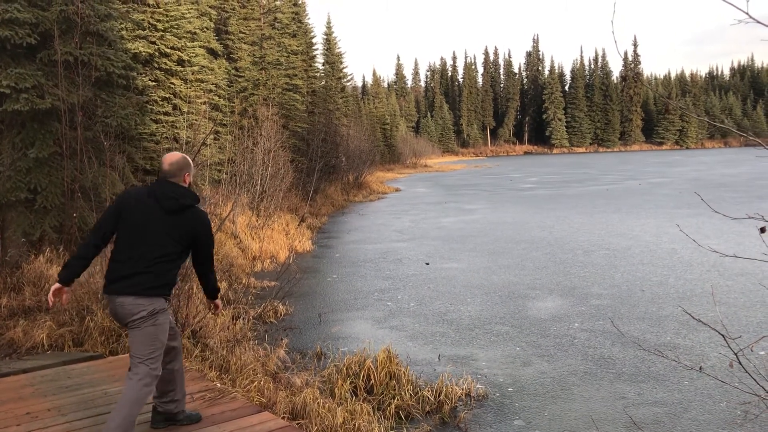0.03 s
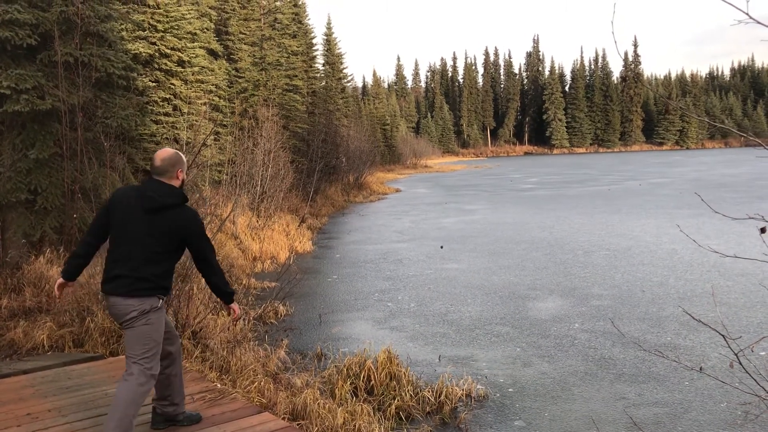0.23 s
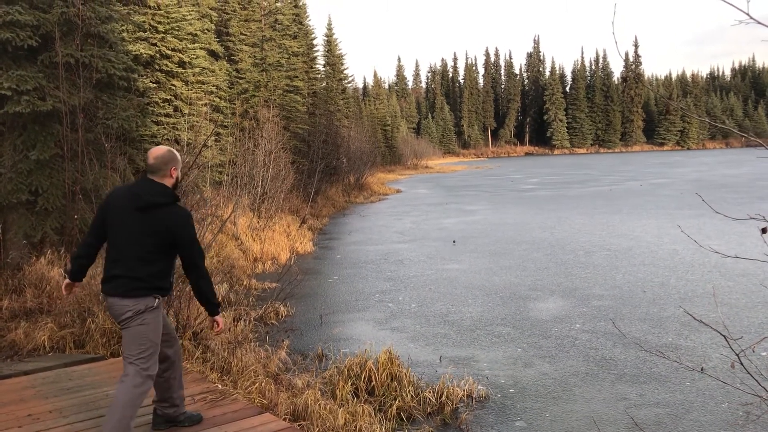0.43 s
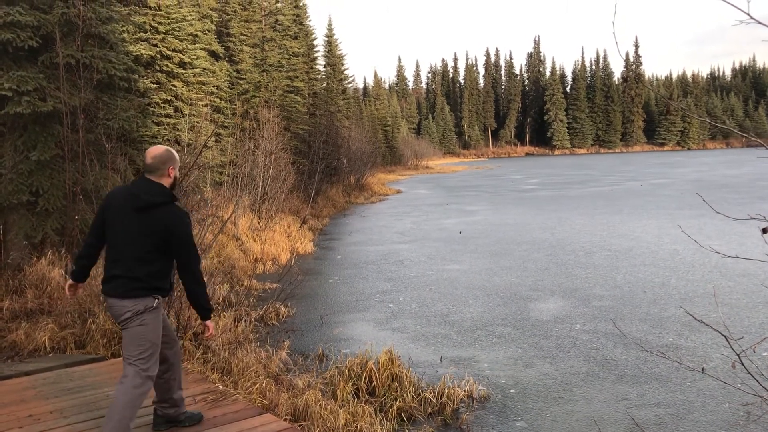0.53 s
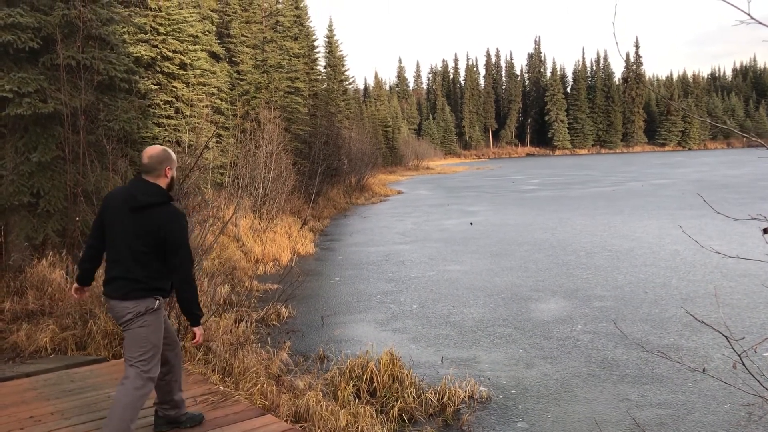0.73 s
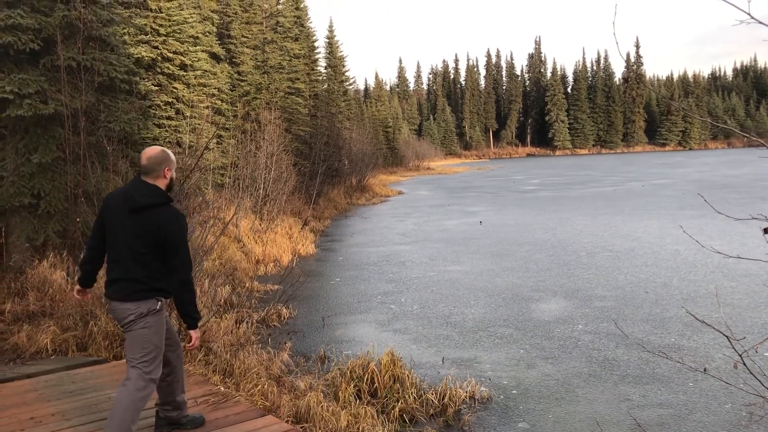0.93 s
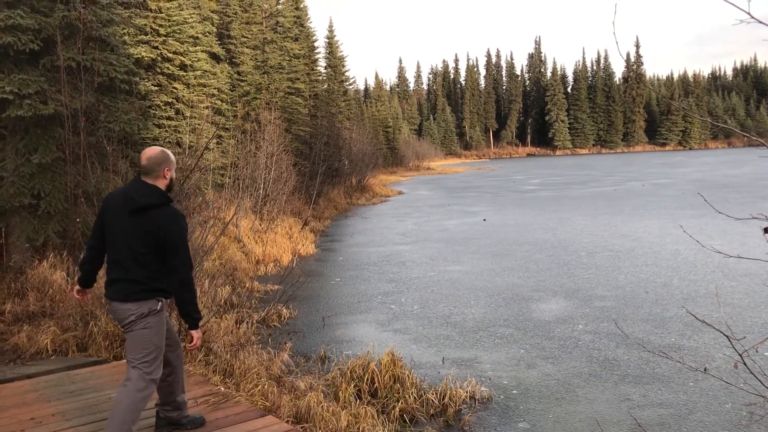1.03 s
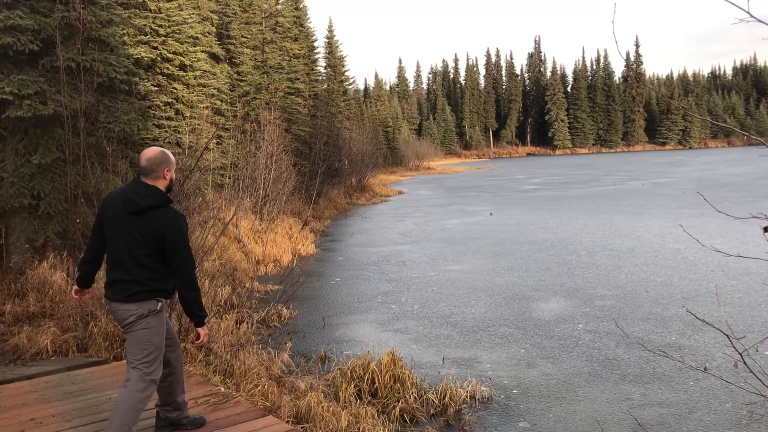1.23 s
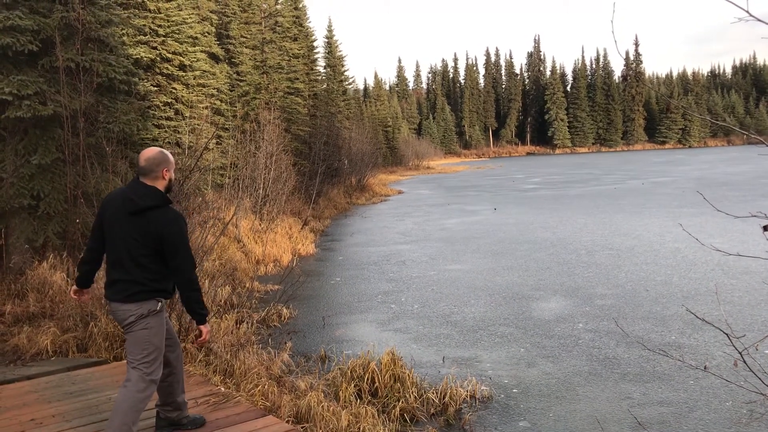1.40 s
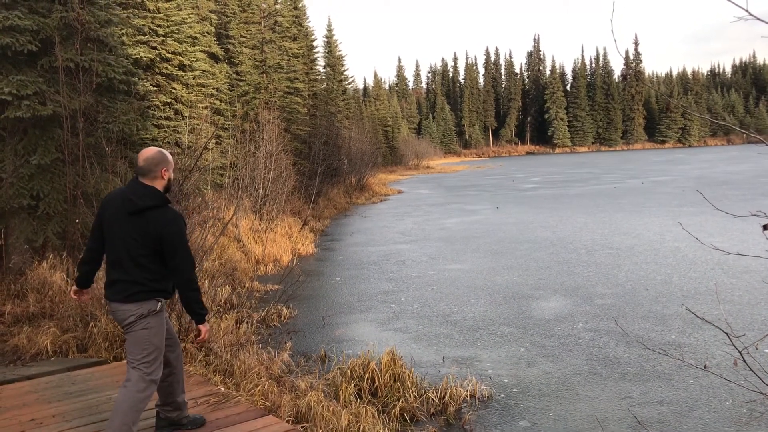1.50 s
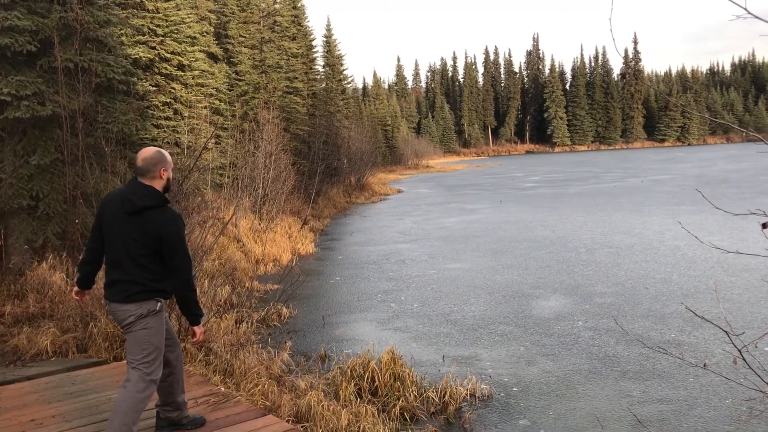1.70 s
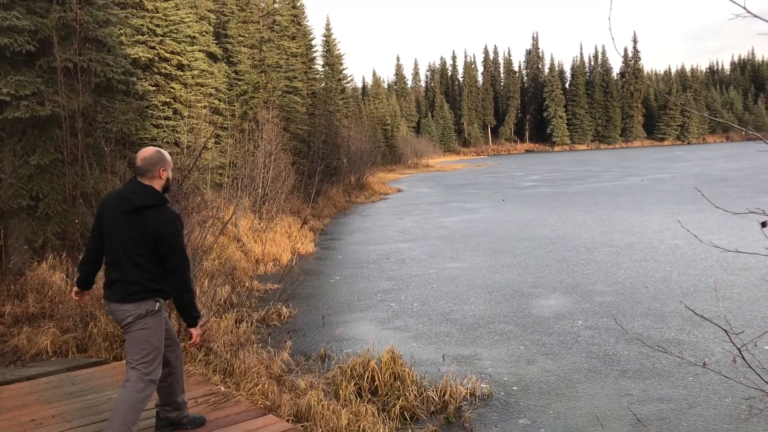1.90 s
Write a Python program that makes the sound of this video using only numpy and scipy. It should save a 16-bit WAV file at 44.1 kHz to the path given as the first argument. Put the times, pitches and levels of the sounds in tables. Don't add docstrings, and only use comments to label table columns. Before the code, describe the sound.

Thin lake ice chirps under a skipping stone: one loud near hit, a softer double, then a run of faint distant ones, over ringing ice hum and quiet outdoor air, mono microphone on the shore.

```python
import sys
import numpy as np
from scipy import signal
from scipy.fft import rfft, irfft
from scipy.io import wavfile
from scipy.ndimage import uniform_filter1d

SR = 44100
rng = np.random.default_rng(int(sys.argv[2]) if len(sys.argv) > 2 else 0)


def field_ratio(decibels):
    return 10 ** (np.asarray(decibels, dtype=float) / 20)


def int16_out(signal):
    q = np.round(np.clip(np.atleast_2d(signal).T, -1, 1) * 32767)
    wavfile.write(sys.argv[1], SR, q.astype(np.int16))


N = 85995


def evened(x):
    return x / np.sqrt(np.mean(x ** 2) + 1e-20)


def read(points, hz):
    f, value = np.transpose(points)
    return np.interp(np.log(hz + 1), np.log(f + 1), value)


def add(mix, start_s, sound):
    part = mix[round(start_s * SR):][:len(sound)]
    part += sound[:len(part)]


def resonate(x, hz, width_hz):
    turn = np.exp(2j * np.pi * hz * np.arange(len(x)) / SR)
    r = np.exp(-np.pi * width_hz / SR)
    return 2 * (turn * signal.lfilter([1 - r], [1, -r], x / turn)).real


def coloured(x, points):
    gain = field_ratio(read(points, np.fft.rfftfreq(len(x), 1 / SR)))
    return irfft(rfft(x) * gain, len(x))


def drift(noise, span_s):
    r = np.exp(-1 / (span_s * SR))
    return evened(signal.lfilter([1], [1, -2 * r, r * r], noise))


def tail(x, decays):
    taps = np.zeros(N)
    at = np.arange(0, N - 20, 20)
    taps[at + rng.integers(0, 20, len(at))] = rng.choice([-1., 1.], len(at))
    hz, t, z = signal.stft(taps, SR, nperseg=256)
    t60_s = np.maximum(read(decays, hz), .02)[:, None]
    echoes = signal.istft(z * field_ratio(-60 * t / t60_s), SR, nperseg=256)[1][:N]
    build_s = .003
    echoes = echoes * np.minimum(np.arange(len(echoes)) / SR / build_s, 1)
    return signal.fftconvolve(x, echoes / np.linalg.norm(echoes[:SR // 10]))[:N]


def tails(x, decays):
    turn = np.arange(N) / SR * 2.3
    shares = [np.sqrt(2 / 3) * np.cos(np.pi * (turn + k / 3)) for k in range(3)]
    return sum(tail(x * share, decays) for share in shares)


# (pitch_hz, level_db per Hz)
AIR_COLOUR = [(24, -34.5), (40, -1), (189, -10), (296, -5), (453, -18), (627, -5), (2300, -19.5),
              (2540, -26), (15800, -38.5)]


def air():
    frames, hz = N // 256 + 5, np.fft.rfftfreq(1024, 1 / SR)
    a, b, patches = rng.standard_normal((frames, 513, 3)).T
    patches = uniform_filter1d(patches, 10, 0)
    patches = evened(uniform_filter1d(patches, 12, 1))
    patchy_db = .5
    z = (a + 1j * b) * field_ratio(read(AIR_COLOUR, hz)[:, None] + patchy_db * patches)
    return field_ratio(-62) * evened(signal.istft(z, nperseg=1024, noverlap=768)[1][:N])


def old_hum():
    level_db, t60_s, skirt_db = -52, 5, -18.5
    noise = rng.standard_normal(N)
    core = evened(resonate(resonate(noise, 767, 133), 767, 133))
    skirt = evened(resonate(resonate(noise, 900, 1400), 900, 1400))
    fade = field_ratio(level_db - 60 * np.arange(N) / SR / t60_s)
    return fade * (core + field_ratio(skirt_db) * skirt)


# (pitch_hz, t60_s), t60 being the time to fade by 60 dB
FOREST_FADE = [(150, 0.53), (400, 0.37), (800, 0.38), (1200, 0.35), (2800, 0.29), (7300, 0.36),
               (14000, 0.23)]


def forest(blurred, cracks, thud):
    whistle_db, tick_db, thud_db = -10, 7, 5.5
    sent = field_ratio(whistle_db) * blurred
    sent = sent + field_ratio(tick_db) * coloured(cracks, TICK_COLOUR)
    sent = sent + field_ratio(thud_db) * thud
    return tails(sent, FOREST_FADE)


# (pitch_hz, t60_s)
SHEET_FADE = [(500, 2.2), (780, 5.4), (1000, 0.41), (1600, 1.5), (3000, 0.91)]


def sheet_hum(blurred):
    return field_ratio(-23.5) * tails(resonate(blurred, 820, 500), SHEET_FADE)


def knock(blows, hz, width_hz):
    return resonate(resonate(blows, hz, width_hz), hz, width_hz) * SR / (2 * width_hz)


def thuds(blows):
    boom_db = -3
    return field_ratio(-25) * (knock(blows, 245.7, 200) + field_ratio(boom_db) * knock(blows, 650, 260))


# (pitch_hz, level_db)
TICK_COLOUR = [(300, -11.5), (1500, -2.5), (3200, -2), (5000, -8.5), (7500, -9.5), (10000, -11),
               (13500, -6), (16000, -8.5)]


def tick(level_db, noise):
    fade_s = .0011
    t = (np.arange(len(noise)) - 40) / SR
    burst = coloured(noise * (t >= 0) * np.exp(-abs(t) / fade_s), TICK_COLOUR)
    return field_ratio(level_db) * burst / abs(burst).max()


# (start_s, tick_db,
# thud_db)
ARRIVALS = [(.2105, -23, -13), (.6060, -29, -17), (1.0310, -30, -29.5), (1.0360, -38, -33.5),
            (1.1930, -47, -48), (1.2030, -42, -33), (1.3120, -42.5, -35), (1.4590, -42, -28.5),
            (1.6560, -56, -33.5), (1.6620, -48, -54), (1.6660, -44.5, -37), (1.8045, -45.5, -38),
            (1.8350, -58, -33), (.7140, -56, -60), (.7980, -55, -36)]


def landings():
    ticks, cracks, blows = np.zeros((3, N))
    for start_s, tick_db, thud_db in ARRIVALS:
        add(ticks, start_s - 40 / SR, tick(tick_db, rng.standard_normal(512)))
        add(cracks, start_s, np.array([field_ratio(tick_db)]))
        add(blows, start_s, np.array([field_ratio(thud_db)]))
    return ticks, cracks, blows


# (pitch_hz, level_db)
WHISTLE_COLOUR = [(700, -2), (900, 0), (1200, -2), (1550, 0), (2200, -9), (2900, -7), (4200, -18),
                  (9000, -40)]


def whistle(length_s, level_db, treble_db, dip_hz):
    bend_noise, hiss_noise, flutter_noise = rng.standard_normal((3, 4096))
    t = np.arange(4096) / SR
    end_hz = 820 + 480 * np.exp(-length_s / .015)
    glide = 3200 * np.exp(-t / (length_s * .108 + .0014))
    flash = 9000 * np.exp(-t / length_s / .025)
    sag = 60 * (1 - t / length_s)
    hz = end_hz + glide + flash + sag

    flutter_db = 2.2 * drift(flutter_noise, .0014)
    db = level_db + read(WHISTLE_COLOUR, hz) + treble_db * np.log2(hz / end_hz) + flutter_db
    rise_s, linger_s = .001, .0015
    shape = np.minimum(t / rise_s, 1) * np.exp(-(np.maximum(t - length_s, 0) / linger_s) ** 2)
    dip_depth, dip_octaves = .9, .18
    shape = shape * (1 - dip_depth * np.exp(-(np.log2(hz / dip_hz) / dip_octaves) ** 2))
    wave = field_ratio(db) * shape * np.sin(2 * np.pi * np.cumsum(hz) / SR)

    cracks_s, cracks_db, tilt_db = .0022, -13, 7
    paths = bend_noise * t / cracks_s * np.exp(-t / cracks_s) * np.sqrt(4 / (cracks_s * SR))
    tilt = [(800, cracks_db), (3200, cracks_db + 2 * tilt_db)]
    scatter = coloured(signal.fftconvolve(wave, paths)[:len(t)], tilt)

    sizzle_s = .0029
    sizzle_db = .2 * level_db - max(-45 - level_db, 0) - 60.5
    sizzle = field_ratio(sizzle_db) * hiss_noise * t / sizzle_s * np.exp(1 - t / sizzle_s)

    broken_hz = 2000
    straight = wave / (1 + (hz / broken_hz) ** 4)
    return straight + scatter + np.diff(sizzle, prepend=0)


# (start_s, length_s, dip_hz)
SKIPS = [
    (.1890, .0220, 1380),
    (.5750, .0320, 1130),
    (.5870, .0365, 1200),
    (.9905, .0450, 1200),
    (.9975, .0520, 1200),
    (1.1595, .0445, 1080),
    (1.2660, .0500, 2000),
    (1.4095, .0560, 2200),
    (1.6100, .0570, 1150),
    (1.7480, .0610, 1900),
]
# (level_db, treble_db per octave)
SKIP_STRENGTHS = [(-8, -4.5), (-24, 5), (-25, 0), (-31, 1), (-38, -3), (-42, 5), (-43, 0), (-43, 1.5),
                  (-43, -1), (-43, 1)]
# (start_s, length_s, dip_hz, level_db, treble_db per octave)
GRAZING = [(.0150, .040, 1100, -58, 3), (.0780, .040, 1100, -64, 4), (.1330, .040, 1100, -62, 4),
           (.1815, .040, 1900, -60, 13), (.3780, .040, 1100, -63, 4), (.5655, .040, 1900, -52, 11),
           (1.1480, .045, 1600, -60, 7), (1.6030, .053, 1500, -56, 4), (.1865, .040, 2600, -54, 13),
           (.5715, .040, 1900, -58, 11)]


def ice_waves():
    ice, send = np.zeros((2, N))
    skips = [where + power for where, power in zip(SKIPS, SKIP_STRENGTHS)]
    for start_s, length_s, dip_hz, level_db, treble_db in skips + GRAZING:
        wave = whistle(length_s, level_db, treble_db, dip_hz)
        add(ice, start_s, wave)
        add(send, start_s, wave * field_ratio(-.34 * max(level_db + 30, 0)))
    return ice, send


def scene():
    floor = air() + old_hum()
    ice, send = ice_waves()
    ticks, cracks, blows = landings()
    thud = thuds(blows)
    blurred = send * drift(rng.standard_normal(N), .0006)
    mix = ice + ticks + thud + floor
    mix += forest(blurred, cracks, thud)
    mix += sheet_hum(blurred)
    return mix[None]


def low_pass(x):
    return signal.sosfilt(signal.butter(12, 16130, fs=SR, output="sos"), x)


def record(dry):
    rolloff = signal.butter(2, 47, "high", fs=SR, output="sos")
    mix = signal.sosfilt(rolloff, dry)
    return low_pass(mix)


dry = scene()
out = record(dry)
int16_out(out)
```